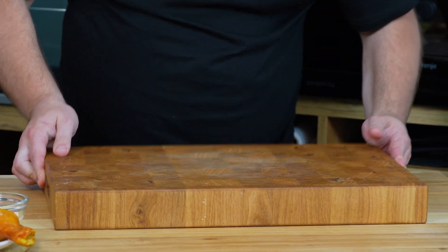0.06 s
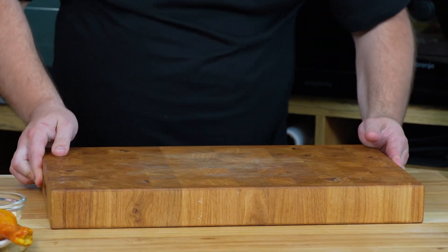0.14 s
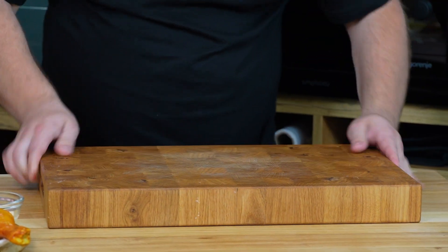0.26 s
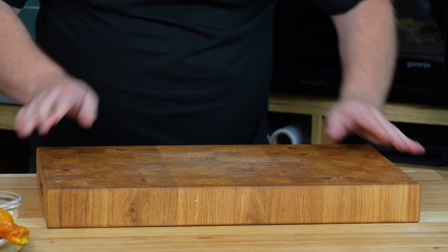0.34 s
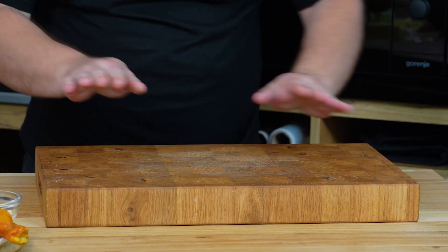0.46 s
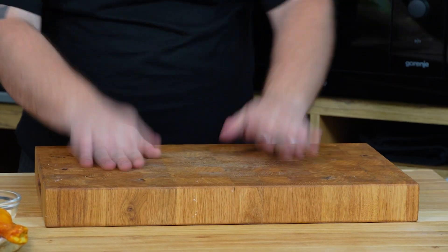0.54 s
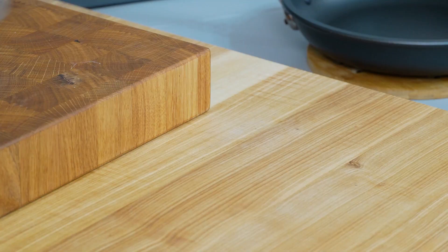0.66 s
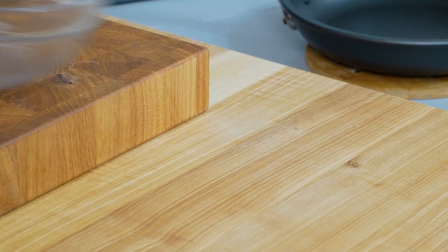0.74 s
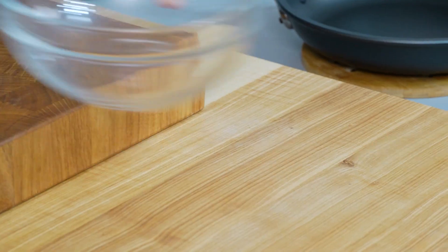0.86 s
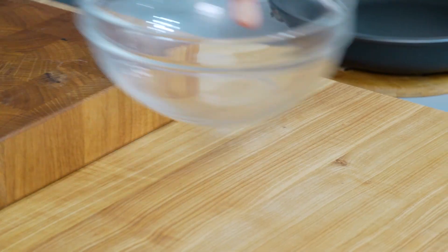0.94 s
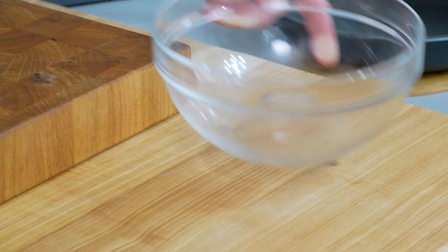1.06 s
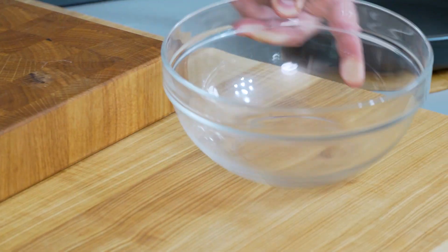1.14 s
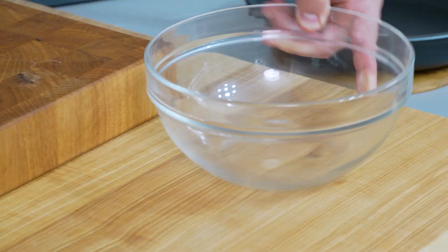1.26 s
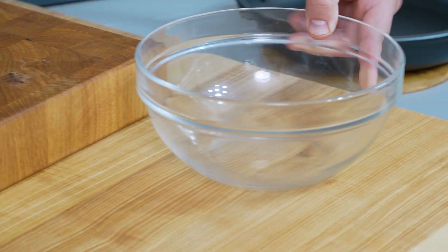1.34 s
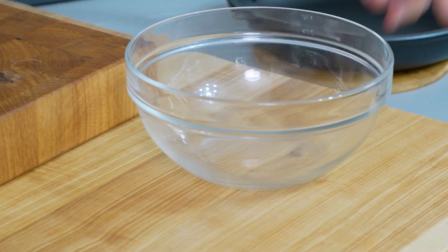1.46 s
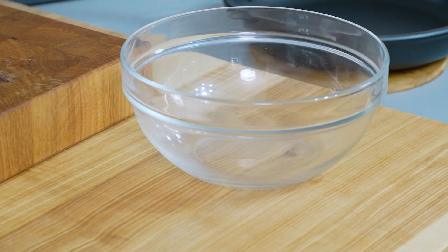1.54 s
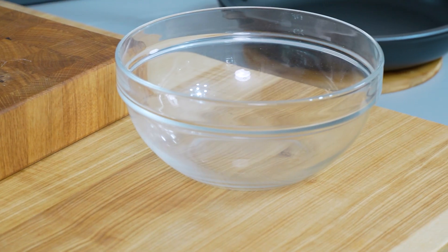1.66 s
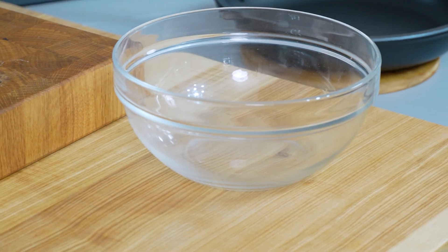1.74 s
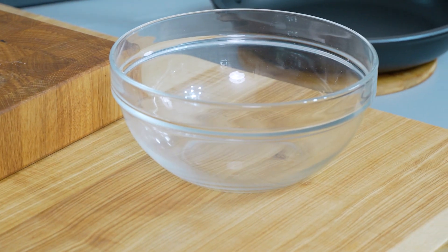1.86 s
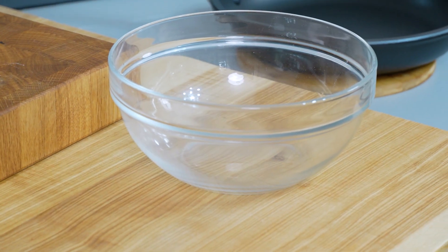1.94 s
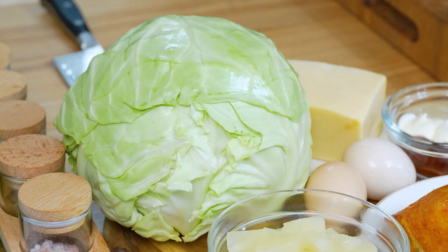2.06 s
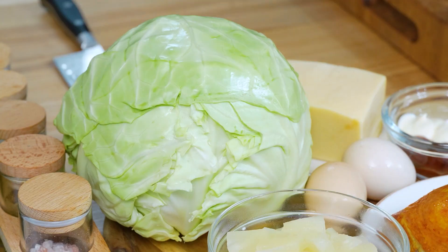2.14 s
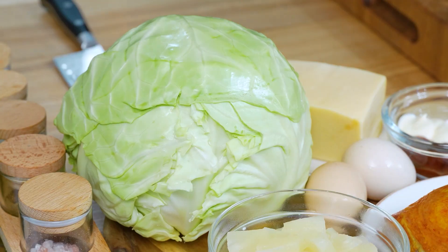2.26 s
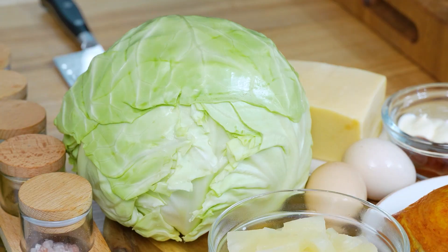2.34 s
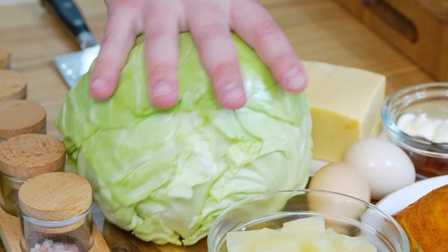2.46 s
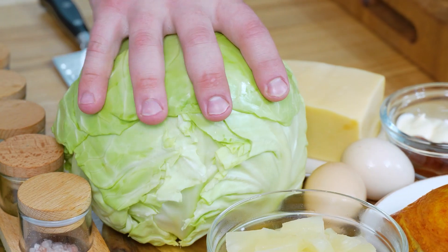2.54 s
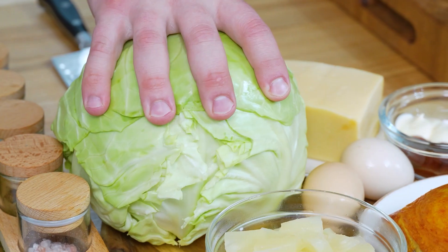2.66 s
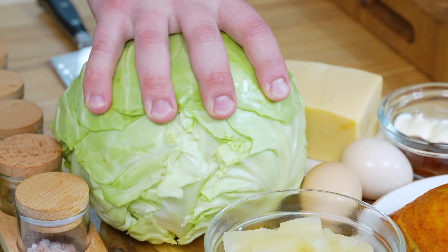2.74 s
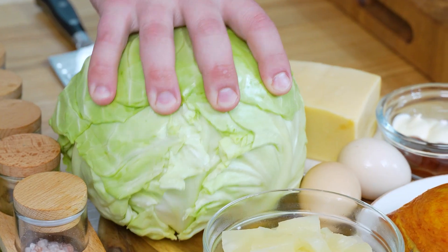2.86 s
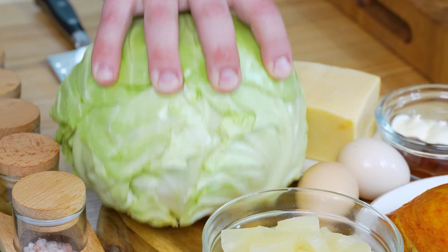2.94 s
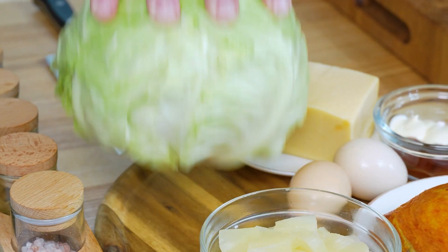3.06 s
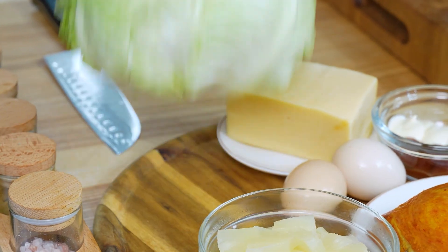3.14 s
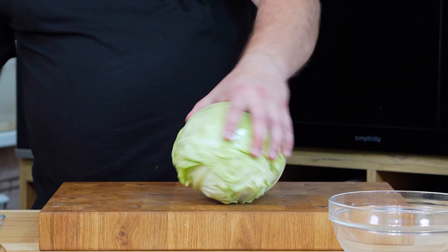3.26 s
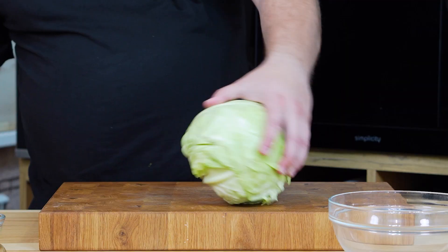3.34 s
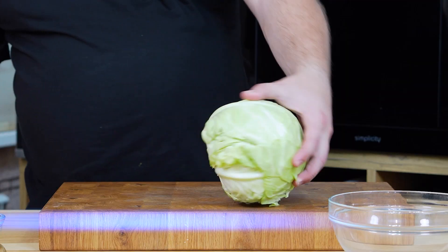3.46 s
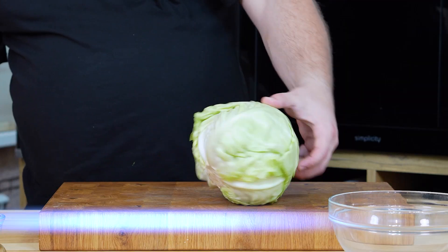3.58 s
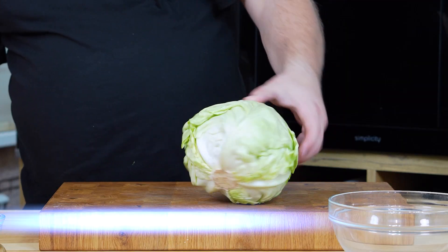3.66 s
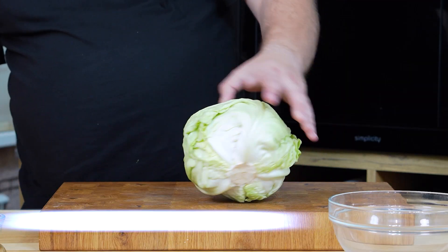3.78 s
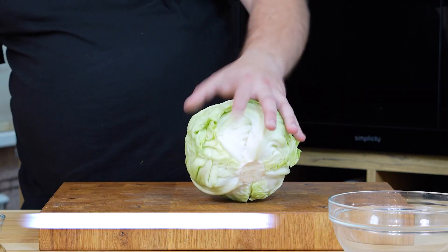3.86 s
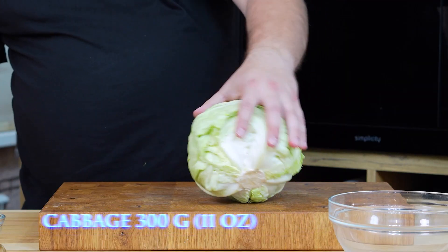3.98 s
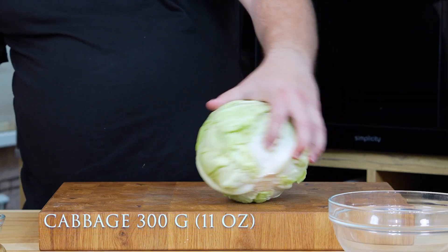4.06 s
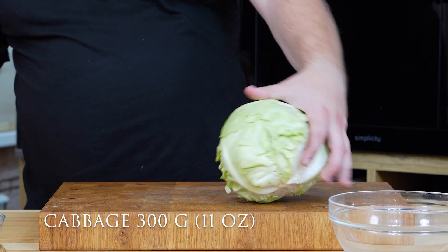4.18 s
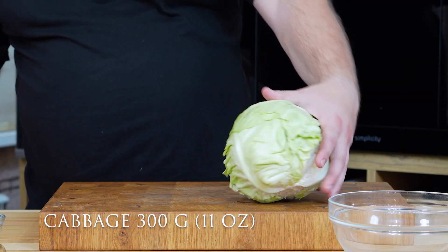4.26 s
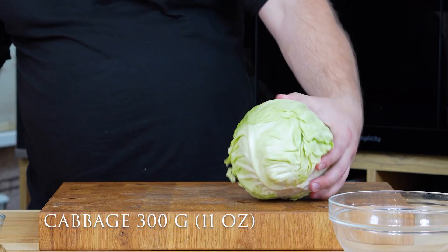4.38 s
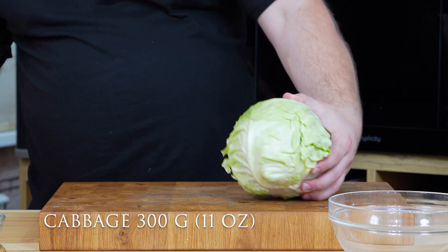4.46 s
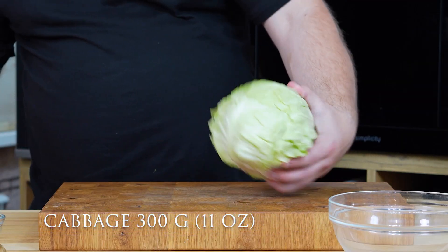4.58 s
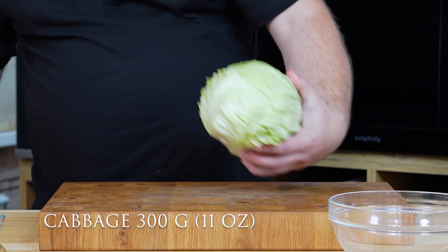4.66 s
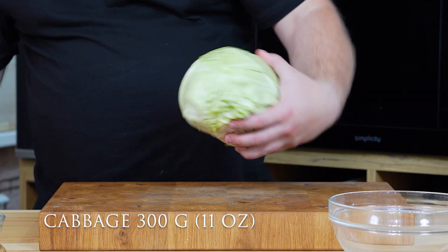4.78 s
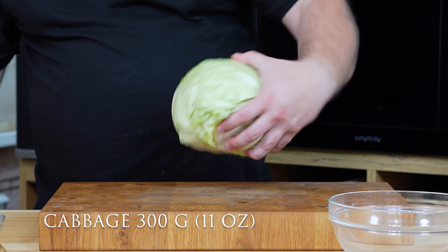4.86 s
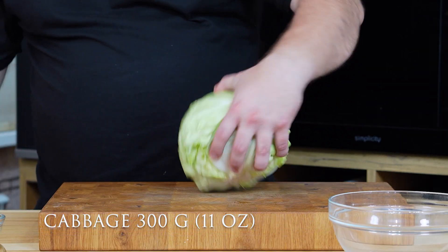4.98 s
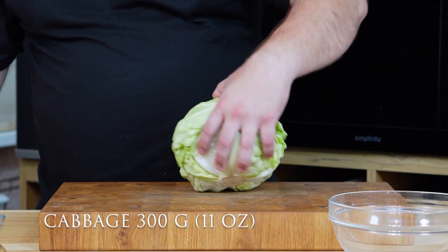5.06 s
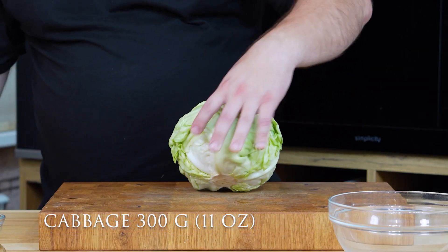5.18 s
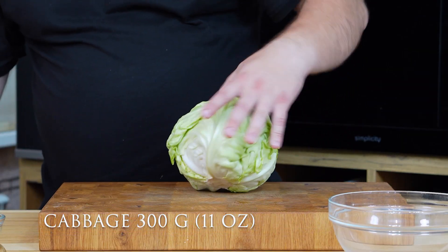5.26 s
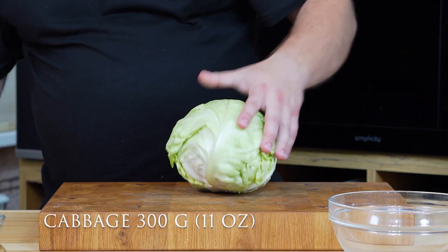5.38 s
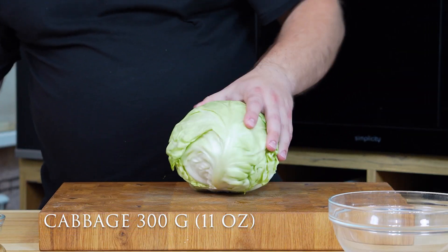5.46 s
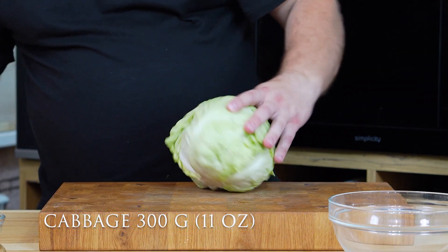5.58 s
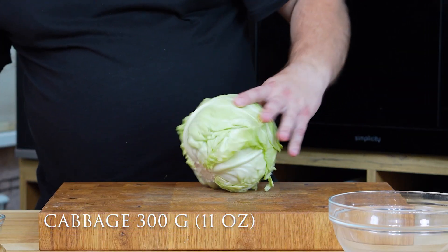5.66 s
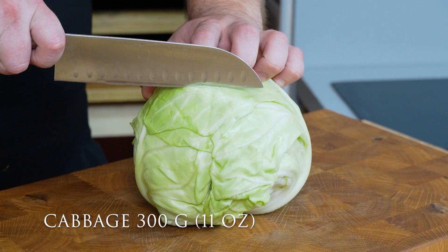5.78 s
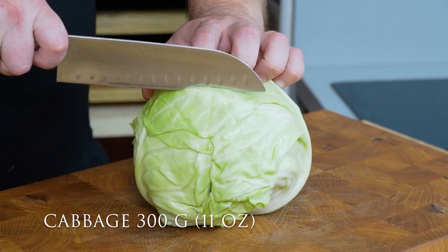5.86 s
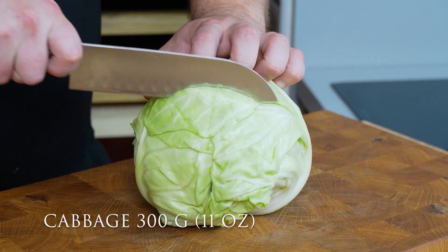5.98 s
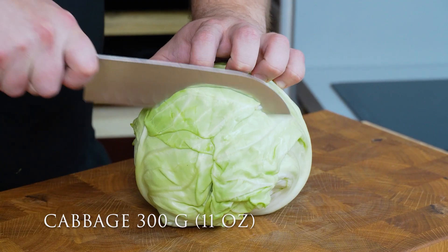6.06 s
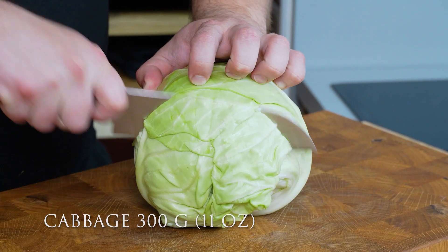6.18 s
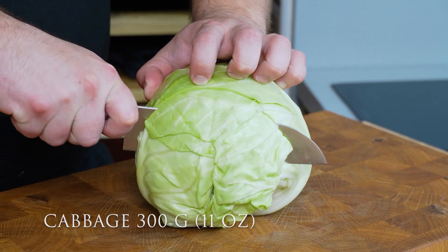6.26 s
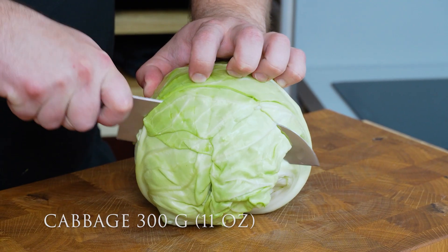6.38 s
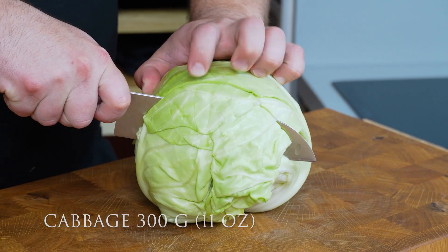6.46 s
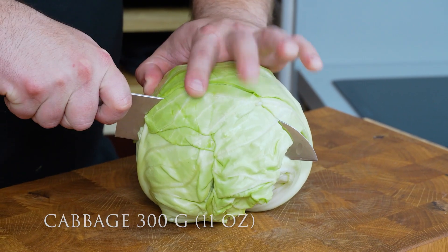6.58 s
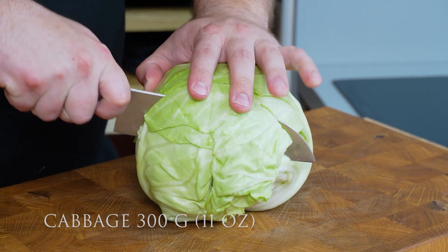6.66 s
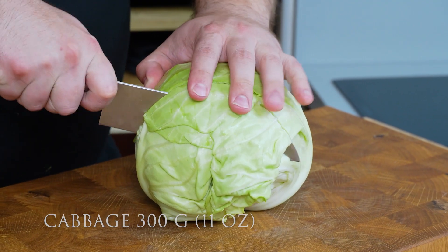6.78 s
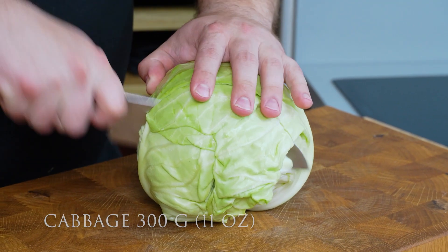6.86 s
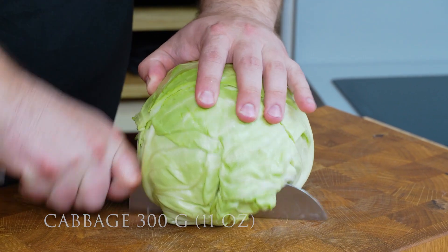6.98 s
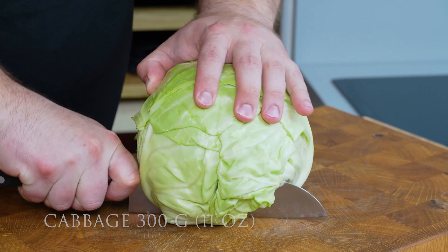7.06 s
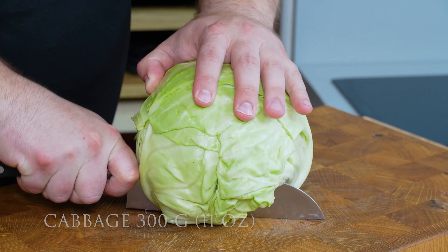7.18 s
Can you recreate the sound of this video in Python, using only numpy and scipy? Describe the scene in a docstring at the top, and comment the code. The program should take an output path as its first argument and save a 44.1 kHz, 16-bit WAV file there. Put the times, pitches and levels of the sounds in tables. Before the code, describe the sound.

Close in a small, live kitchen, a thick wooden board scrapes briefly and thuds down, then takes a sharp slap. A glass bowl knocks hard on wood, lands twice with a quick fading rattle and short ring. After a quiet gap a cabbage is patted, rustles and snaps as it is lifted and rolled, drops with a deep sagging thump, and a knife slices slowly before crunching through to the wood.

```python
"""Kitchen counter, heard close: a heavy wooden board slides and is slapped; a glass bowl knocks, lands and rocks to rest.
A cabbage is patted, lifted, rolled and dropped on the board; a knife then slices it and crunches through to the wood.
Impacts are filtered pulses and bursts, ringing is a sum of decaying modes, and rubbing and cutting are crackle.
The small, live room adds reflections and booms in its low modes under the blows, over a faint mains hum."""
import sys
import numpy as np
from scipy import signal
from scipy.fft import rfft, irfft, next_fast_len
from scipy.io import wavfile
from scipy.ndimage import uniform_filter1d

SR = 44100
rng = np.random.default_rng(int(sys.argv[2]) if len(sys.argv) > 2 else 0)


def master_out(mix):
    """Clip the mix to full scale and print it as 16-bit PCM to the path in sys.argv[1]."""
    frames = np.transpose(np.atleast_2d(mix))
    ceiling = np.clip(frames, -1, 1)
    pcm = np.round(ceiling * 32767).astype(np.int16)
    wavfile.write(sys.argv[1], SR, pcm)


N = 318843  # samples
TIME = np.arange(N) / SR  # s
AGE = TIME[:32768]  # s since the onset of one sound
FREQ = np.fft.rfftfreq(len(AGE), 1 / SR)  # Hz

# landings of the bowl on the wood: t/s, relative level/dB, knock f/Hz, hard-edge level/dB,
# extra feed of the high glass modes/dB, number of rocks that follow (rounded), relative level of first rock/dB
LANDINGS = [(0.8617, -2.5, 687, 6.5, 8, 0, 0), (1.2035, 1, 927, -2.5, -4, 2, -9.5),
            (1.2890, -.5, 921, -4.5, -1, 6.5, -3.5), (1.455, -25.5, 900, -34, -22, 0, 0)]


def amp(db):
    """Logarithmic level: decibels to amplitude gain."""
    return 10 ** (np.asarray(db) / 20)


def unit(x):
    """Normalization by mean power: scale to rms 1."""
    return x / np.sqrt(np.mean(x ** 2) + 1e-20)


def along(points, hz):
    """Interpolation of (f/Hz, value) points on a logarithmic frequency axis."""
    f, v = np.transpose(points)
    return np.interp(np.log(hz + 1), np.log(f + 1), v)


def fade(t60):
    """Exponential damping of amplitude, 60 dB down after t60 seconds."""
    return np.exp(-np.log(1000) * AGE / t60)


def add(track, s, sound):
    """Linear superposition: mix a sound in at time s."""
    part = track[max(round(s * SR), 0):][:len(sound)]
    part += sound[:len(part)]


def filtered(x, gain):
    """Zero-phase filtering by a gain function of frequency."""
    m = next_fast_len(N + SR // 2)
    spectrum = rfft(x, m)
    return irfft(spectrum * gain(np.fft.rfftfreq(m, 1 / SR)), m)[:N]


def pulse(gain):
    """Minimum-phase impulse response with these gains on FREQ, by folding the cepstrum."""
    cepstrum = irfft(np.log(np.maximum(gain, 1e-6)))
    half = len(AGE) // 2
    cepstrum[1:half] *= 2
    cepstrum[half + 1:] = 0
    return irfft(np.exp(rfft(cepstrum)))


def coloured(burst, gain):
    """Spectral shaping: give a random burst a set broad spectrum and keep its fine ripple."""
    spectrum = rfft(burst)
    broad = np.sqrt(np.abs(uniform_filter1d(np.abs(spectrum) ** 2, size=51)) + 1e-20)
    return irfft(spectrum * rfft(pulse(gain / broad)))


def hump(centre_hz, octaves, hz=FREQ):
    """Gain of a broad, steep-sided resonance; it halves this many octaves from the centre."""
    return 1 / (1 + (np.log2((hz + 1) / centre_hz) / octaves) ** 4)


def wobble(per_second, count):
    """Random modulation: a curve of count samples drawn through normal values at this rate."""
    place = np.arange(count) * per_second / SR
    knots = rng.standard_normal(int(place[-1]) + 2)
    return np.interp(place, np.arange(len(knots)), knots)


def noise(spectrum):
    """Stationary Gaussian noise with a shaped spectrum, rms 1."""
    return unit(filtered(rng.standard_normal(N), lambda hz: amp(along(spectrum, hz))))


def crackle(spectrum, per_second, spread_db, clump_db):
    """Shot noise: tiny ruptures at random times, of uneven size and swaying strength, rms 1."""
    sizes = amp(spread_db * np.minimum(rng.standard_exponential(N), 4))
    sizes *= rng.choice([-1, 1], N)
    sizes *= amp(clump_db * np.tanh(wobble(70, count=N)))
    ruptures = sizes * (rng.random(N) < per_second / SR)
    return unit(filtered(ruptures, lambda hz: amp(along(spectrum, hz))))


def strokes(rows, onset_db, release_db):
    """Friction envelope: bite onset_db under the peak, swell, then lose release_db over the release time."""
    gain = np.zeros(N)
    for start, swell, release, db in rows:
        t = np.maximum(TIME - start, 0)
        swelling = onset_db * (1 - t / max(swell, .001))
        releasing = release_db * (t - swell) / max(release, .001)
        under = np.maximum(swelling, releasing)
        gain += amp(db - under) * (1 - np.exp(-t / 0.0058))
    return gain


def room(x, wet_db, bounce, bounce_s=.005, walls_s=0.013, scatter=0.67, low_hz=110):
    """Reverberation by convolution: direct sound, one near reflection, then a diffuse tail."""
    # reverberation time: f/Hz, T60/s
    decay_times = [(60, 0.69), (200, 0.69), (700, 0.4), (3000, 0.41), (7000, 0.38), (15000, 0.56)]
    hz, t, z = signal.stft(rng.standard_normal(len(AGE)), SR, nperseg=256)
    decay = np.exp(-np.log(1000) * t / along(decay_times, hz)[:, None])
    tail = signal.istft(z * decay, SR, nperseg=256)[1][:len(AGE)]
    tail *= np.where(AGE < walls_s, scatter, 1)  # weaker scatter before the walls answer
    response = amp(wet_db) * coloured(tail, FREQ ** 2 / (FREQ ** 2 + low_hz ** 2) + .01)
    response[0] += 1
    response[round(bounce_s * SR)] += bounce
    return signal.fftconvolve(x, response)[:N]


def background():
    """Stationary sources: broadband room air and a sinusoidal mains hum."""
    # room air: f/Hz, relative spectral level/dB
    air = [(15, -36.5), (25, -3.5), (59, -2.5), (97, -9), (236, -15.5), (463, -9), (641, -17),
           (1070, -14.5), (1890, -25), (4140, -25.5), (5430, -24), (6560, -33), (16000, -46.5)]
    air_db, hum_db, mains_hz = -70.5, -70.5, 50  # rms of the air, peak of the hum
    return amp(air_db) * noise(air) + amp(hum_db) * np.sin(2 * np.pi * mains_hz * TIME)


def board_slide():
    """Sliding friction: the board scrapes the counter in many tiny ruptures."""
    # pushes of the board: start t/s, swell/s, release/s, relative peak level/dB
    shoves = [(0, .055, .16, -46.5), (.105, .028, .02, -45)]
    # scrape: f/Hz, relative spectral level/dB
    scrape = [(47, -43), (80, -24), (195, 1), (262, -24), (339, -14.5), (600, -28.5), (676, -10),
              (761, -23.5), (1040, -11), (1430, -22), (3630, -35), (4000, -44.5), (9000, -58), (11700, -93),
              (19800, -120)]
    grain = crackle(scrape, per_second=1500, spread_db=-1.5, clump_db=-2)
    return room(strokes(shoves, onset_db=6.5, release_db=22.5) * grain * amp(3), wet_db=-2, bounce=0.053)


def blows():
    """Impact excitation: a soft, heavy contact gives a short noise burst and sets the room modes booming."""
    # blows of board, hands, cabbage and knife: t/s, relative level/dB, relative boom level/dB,
    # thud boost/dB, treble corner f/Hz, burst T60/s
    impacts = [(0.11, -48.5, -47, -13, 2925, 0.035), (0.145, -26.5, -30.5, -6.5, 1044, .022),
               (0.612, -43, -69.5, -3, 3458, .02), (0.618, -19, -27.5, -2, 4420, .028),
               (1.669, -50, -63.5, 7, 752, .025), (2.493, -40.5, -57.5, 2, 5200, 0.029),
               (2.506, -28, -34.5, -9.5, 1670, 0.025), (2.945, -41.5, -64, -17, 2960, .029),
               (3.353, -40.5, -71.5, -7, 4330, 0.046), (3.616, -54.5, -61, -8.5, 8930, 0.04),
               (5.078, -35.5, -29.5, 2.5, 3940, 0.035), (6.401, -47.5, -63, -6, 2110, 0.013),
               (7.01, -25.5, -58, 4, 4670, .014)]
    # colour shared by all blows: f/Hz, relative level/dB
    colour = [(220, -5.5), (700, -1), (1700, -1), (3400, 4), (6000, 1.5), (9000, 3), (13500, 13.5)]
    # low room modes: f/Hz, level relative to the boom/dB, T60/s
    low_modes = [(35.7, -11, 0.77), (44.8, -8.5, 0.96), (65.2, 5.5, .66), (79.65, 0, 0.41), (89, -5, 0.5),
                 (111.4, -4.5, 0.18), (157.5, -10, .6), (189, -8, 0.6), (280, -13.5, 0.29)]
    thud_hz = 365  # a blow's thud lies below this
    hz, mode_db, t60 = np.transpose(low_modes)
    # wandering phases keep the boom from being pure tones
    drift = .5 * np.array([wobble(16, count=len(AGE)) for _ in hz])
    modes = np.sin(2 * np.pi * hz[:, None] * AGE + drift)
    modes *= fade(t60[:, None]) * (1 - fade(0.049))
    # downward tilt with a bass cut
    slope = np.sqrt(1000 / (FREQ + 100)) * FREQ / np.hypot(FREQ, 90)
    out = np.zeros(N)
    for s, db, boom_db, thud_db, corner_hz, burst_t60 in impacts:
        burst = rng.standard_normal(len(AGE)) * fade(max(burst_t60, .002)) * (1 - fade(.035))
        colour_db = along(colour, FREQ) + thud_db / (1 + (FREQ / thud_hz) ** 4)
        treble_cut = np.hypot(1, (FREQ / corner_hz) ** 3)
        hit = coloured(burst, slope * amp(db + colour_db + 36) / treble_cut)
        add(out, s, room(hit, wet_db=4, bounce=0.9, bounce_s=0.0037))
        add(out, s, amp(boom_db + mode_db + rng.normal(0, 0.46, len(hz))) @ modes)
    return out


def contacts():
    """Rocking with energy loss: landings, then quicker, weaker, lower rocks, as rows of
    t/s, relative level/dB, knock f/Hz, hard-edge level/dB, high-mode feed/dB."""
    first_gap_s, gap_ratio = .0245, .86
    loss_db, pitch_ratio = 2.08, 0.95  # per rock
    rock_edge_db, rock_ring_db = -20.5, -13  # rocking is soft: little clack, little high ring
    rows = []
    for s, db, hz, edge_db, ring_db, rocks, rock_db in LANDINGS:
        rows.append((s, db, hz, edge_db, ring_db))
        for k in range(round(rocks)):
            s += first_gap_s * gap_ratio ** k
            hz *= pitch_ratio
            rows.append((s, rock_db - loss_db * k, hz, rock_edge_db, rock_ring_db))
    return rows


def bowl_knocks():
    """Impulse response of glass on wood: a resonant knock, a bright clack at hard edges, and two foot ticks."""
    # wooden knock: f/Hz, relative level/dB
    wood = [(40, -27.5), (110, -25), (152, -2), (200, -19), (300, -5.5), (450, -11.5), (750, 2),
            (1050, -3.5), (1500, -9.5), (2200, -32), (4000, -36.5), (8000, -65), (16000, -80.5)]
    # hard-edge clack: f/Hz, relative level/dB
    edge = [(100, -22), (180, 4), (400, -13.5), (1100, -1.5), (1700, -2.5), (2600, -13), (5000, -29.5),
            (8000, -42.5), (15000, -56)]
    # ticks of the bowl's foot, with little reverberation: t/s, relative level/dB
    foot_ticks = [(1.2037, -13), (1.2898, -15)]
    knocks, ticks = np.zeros((2, N))
    wood_gain = amp(along(wood, FREQ) + 24)
    clack_gain = amp(along(edge, FREQ) + 13.0)
    for s, db, knock_hz, edge_db, _ in contacts():
        body = wood_gain * (1 + hump(knock_hz, octaves=0.24))
        add(knocks, s, amp(db) * pulse(np.hypot(body, amp(edge_db) * clack_gain)))
    for s, db in foot_ticks:
        burst = rng.standard_normal(len(AGE)) * fade(0.0068)
        add(ticks, s, amp(db + 0.5) * coloured(burst, hump(3400, octaves=1.9)))
    return room(knocks, wet_db=5.5, bounce=0.47) + room(ticks, wet_db=-13, bounce=0.36)


def bowl_ring():
    """Modal synthesis: each contact adds energy to damped glass modes, most near its knock pitch."""
    # modes of the bowl: f/Hz, relative level/dB, T60/s
    glass = [(548, -15, 1), (605, -12, 0.36), (675, -13, 0.24), (734, -3, 0.47), (775, -5, .36),
             (854, -2, .38), (903, -4, 0.48), (947, -7, .33), (988, -1, 0.31), (1059.3, -2.5, 0.21),
             (1166, -2.5, 0.41), (1174, -8, 0.37), (1404, -11, .36), (1410, -8, .38), (1478, -5, 0.48),
             (1734, -13.5, 0.3), (2547, -23.5, .28), (3343, -15, .2), (3881, -13, .36), (6191, -15.5, .4),
             (6222, -22, .38), (8294, -36, .35), (8527, -37, .38), (9330, -33, 0.42), (9500, -40, .32),
             (10527, -43, 0.53), (10870, -44, .38), (12340, -39, .35), (14270, -47.5, .32)]
    focus_db = 13  # extra feed of a mode at the knock pitch
    out = np.zeros(N)
    t = TIME[:SR + SR // 2]
    start = LANDINGS[0][0]
    for hz, mode_db, t60 in glass:
        energy = np.zeros(len(t))
        dying = fade(t60 / 2) * (1 - fade(0.014))  # energy falls twice as fast in dB as its root
        high = hz > 1600  # these modes take the separate feed level
        for s, db, knock_hz, _, ring_db in contacts():
            feed_db = db + high * ring_db + focus_db * hump(knock_hz, octaves=0.14, hz=hz)
            add(energy, s - start, amp(feed_db) ** 2 * dying)
        # reflections swell and thin each partial
        swell = amp(3.2 * wobble(50, count=len(t)))
        phase = 2 * np.pi * (hz * t + rng.random()) + 0.39 * wobble(30, count=len(t))
        add(out, start, amp(mode_db - 26.5) * np.sqrt(energy) * swell * np.sin(phase))
    return out


def bowl():
    """Superposition of the glass-on-wood knocks and the ringing that they feed."""
    return bowl_knocks() + bowl_ring()


def leaf_rustle():
    """Friction as shot noise: leaves rustle densely and tick sparsely under the hand."""
    # the hand grips, lifts or turns the cabbage: start t/s, swell/s, release/s, relative peak level/dB
    grips = [(2.58, 0.038, 0.45, -53), (2.861, .005, 0.089, -44), (2.92, 0.015, 0.12, -39.5),
             (3.0, 0.018, 0.35, -65), (3.32, .012, 0.15, -47.5), (3.54, 0.054, 0.19, -51.5),
             (3.68, 0.052, 0.61, -51.5), (4.075, 0.037, 0.67, -55.5), (4.28, 0.12, 0.11, -53.5),
             (5.08, 0.077, 2.1, -60.5), (5.43, 0.036, 0.79, -56.5), (5.605, .03, .09, -49),
             (5.735, 0.012, .12, -54)]
    # leaves: f/Hz, relative spectral level/dB
    leaf_colour = [(200, -19), (500, -6), (900, 1.5), (1500, 0), (2200, 0), (3500, 3.5), (5400, 1),
                   (7800, -11.5), (12000, -14), (16000, -30)]
    leaves = crackle(leaf_colour, per_second=1500, spread_db=3.5, clump_db=3.5)
    ticks = crackle(leaf_colour, per_second=100, spread_db=5.0, clump_db=9.5)
    rustle = leaves * amp(-8.0) + ticks * amp(-14.5)
    return room(strokes(grips, onset_db=10.5, release_db=24) * rustle, wet_db=-2, bounce=0.053)


def snaps():
    """Brittle fracture: single crisp cracks, mostly of leaf ribs, as short band-shaped bursts."""
    # cracks: t/s, relative level/dB, centre f/Hz
    cracks = [(2.6394, -42, 4470), (2.8663, -31.5, 4770), (2.9284, -33.5, 3440), (2.9645, -26.5, 1270),
              (3.3562, -28, 3520), (3.6794, -39, 3630), (4.204, -43.5, 1220), (4.3688, -33, 2890),
              (4.4019, -30, 2605), (5.5646, -32, 2800), (5.6313, -32, 2100), (5.8268, -38, 4920),
              (6.0695, -31, 1020), (6.8485, -39.5, 1593), (7.0276, -21.5, 3400), (7.0482, -19.5, 1660)]
    out = np.zeros(N)
    for s, db, hz in cracks:
        crack = coloured(rng.standard_normal(len(AGE)) * fade(0.016), hump(hz, octaves=0.69))
        add(out, s, amp(db + 13.5) * crack)
    return room(out, wet_db=0.0, bounce=0.89)


def cabbage_roll():
    """Rolling noise: each shift of the cabbage's weight swells and damps a low rumble."""
    # shifts of weight on the board: t/s, relative level/dB
    lurches = [(3.325, -53), (3.38, -58), (3.615, -47), (3.7, -60.5), (3.93, -54), (4.06, -69), (4.49, -69),
               (5.53, -52.5), (5.649, -68), (6.28, -54), (6.66, -59.5), (6.84, -54.5)]
    # rumble: f/Hz, relative spectral level/dB
    rumble = [(15, -36), (25, -2.5), (42, -2.5), (64, 2.5), (110, -22), (155, -12.5), (400, -30.5),
              (900, -16), (1700, -57), (2200, -25), (3000, -64)]
    rise_s, decay_t60 = 0.019, 0.57  # each lurch swells and dies alike
    weight = np.zeros(N)
    for s, db in lurches:
        add(weight, s, amp(db) * (1 - np.exp(-AGE / rise_s)) * fade(decay_t60))
    return weight * noise(rumble) * amp(3.5)


def bumps():
    """Damped resonance: the hollow leaf head answers a tip onto a rib with one broad peak."""
    # the cabbage tips onto a rib: t/s, relative level/dB, pitch f/Hz
    tips = [(3.384, -44, 168), (3.405, -33, 333), (4.511, -47, 186), (5.507, -48, 523)]
    out = np.zeros(N)
    for s, db, hz in tips:
        add(out, s, amp(db + 35) * pulse(hump(hz, octaves=0.61)))
    return room(out, wet_db=3.0, bounce=0.67)


def quiver():
    """Stiffness-controlled pitch: the dropped head's low thump sags as its squeezed leaves relax."""
    drop_s, drop_db = 5.083, -24
    squeezed_hz, rest_hz, sag_s, quiver_t60 = 91.9, 39.7, .1, 0.65  # sag_s is a time constant
    overtone, overtone_db = 2.8, -14.5  # multiple of the pitch, and its relative level
    out = np.zeros(N)
    hz = rest_hz + (squeezed_hz - rest_hz) * np.exp(-AGE / sag_s)
    phase = 2 * np.pi * np.cumsum(hz) / SR
    tone = np.sin(phase) + amp(overtone_db) * np.sin(overtone * phase)
    add(out, drop_s, amp(drop_db) * tone * fade(quiver_t60) * (1 - fade(0.033)))
    return out


def knife():
    """Fracture as shot noise: the blade bursts leaf cells in slow slices, then in a hard push."""
    # the blade works through the outer leaves: start t/s, swell/s, release/s, relative peak level/dB
    slices = [(5.9, 0.045, 0.53, -49.5), (5.96, .23, .14, -41.5), (6.19, 0.057, 0.08, -34.5),
              (6.33, 0.06, 0.16, -57)]
    # the blade is forced through the heart: start t/s, swell/s, release/s, relative peak level/dB
    crunches = [(6.91, .097, 0.076, -26)]
    # slicing: f/Hz, relative spectral level/dB
    slice_colour = [(100, -13), (330, -22.5), (550, -7.5), (900, -2), (1300, -10), (1700, -8.5),
                    (2400, -15.5), (3700, -9.5), (5500, -16.5), (8000, -26), (12000, -28.5), (16000, -33)]
    # crunching: f/Hz, relative spectral level/dB
    crunch_colour = [(100, -22), (330, -17), (600, -3.5), (950, 4), (1400, -6), (2400, -5.5), (3500, -4),
                     (5300, -11.5), (7600, -21.5), (12000, -23), (16000, -31)]
    slicing = strokes(slices, onset_db=19.5, release_db=23) * amp(-3.5)
    slicing *= crackle(slice_colour, per_second=1600, spread_db=3.0, clump_db=3.5)
    crunching = strokes(crunches, onset_db=21, release_db=23.5) * amp(-1.0)
    crunching *= crackle(crunch_colour, per_second=1700, spread_db=-1, clump_db=3.0)
    return room(slicing + crunching, wet_db=0.5, bounce=0.14)


def scene():
    """Superposition of all sources at one microphone."""
    counter = background() + board_slide() + blows() + bowl()
    cabbage = leaf_rustle() + snaps() + cabbage_roll() + bumps() + quiver()
    return (counter + cabbage + knife())[None]


def record(dry):
    """Saturation and band limiting: the loudest peaks flatten at a ceiling, then the top is cut."""
    ceiling, top_hz = .64, 15800
    held = dry[0] / (1 + np.abs(dry[0] / ceiling) ** 8) ** (1 / 8)
    return filtered(held, lambda hz: hz < top_hz)[None]


dry = scene()
out = record(dry)
master_out(out)
```